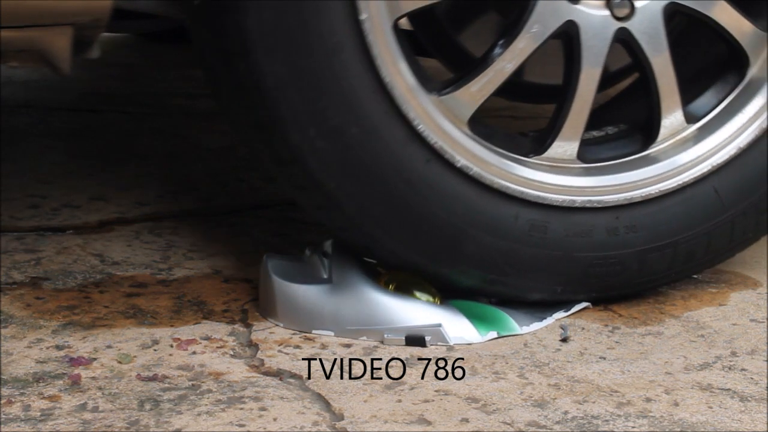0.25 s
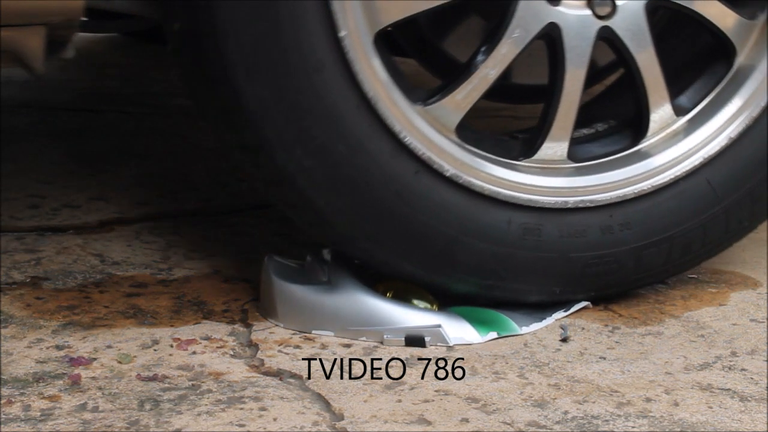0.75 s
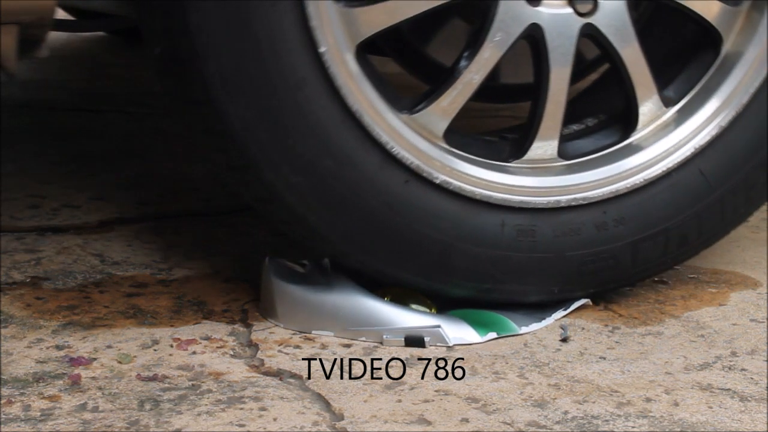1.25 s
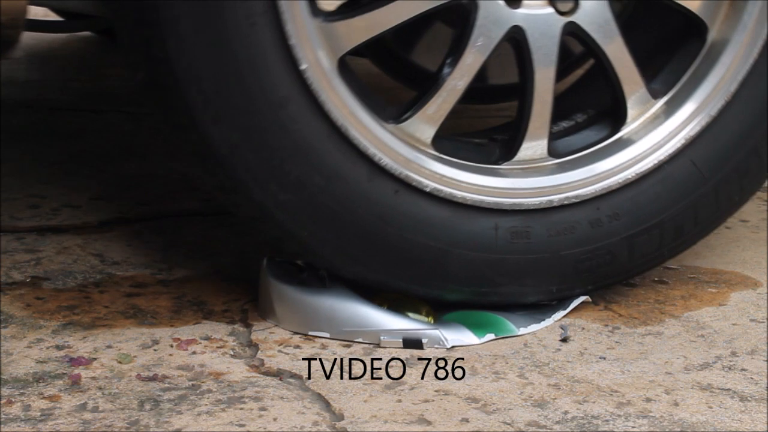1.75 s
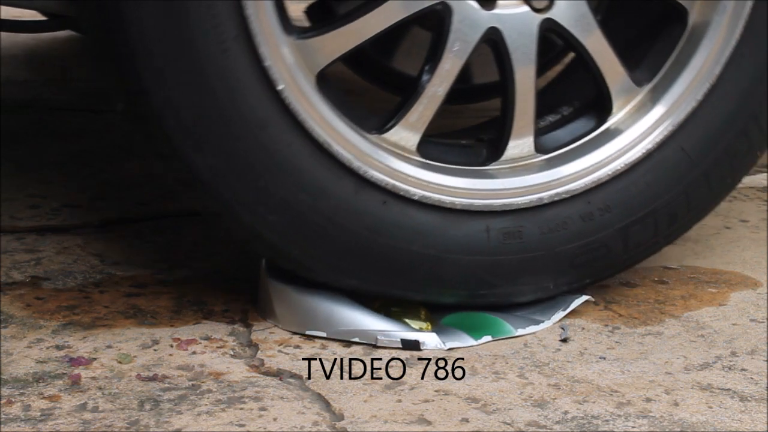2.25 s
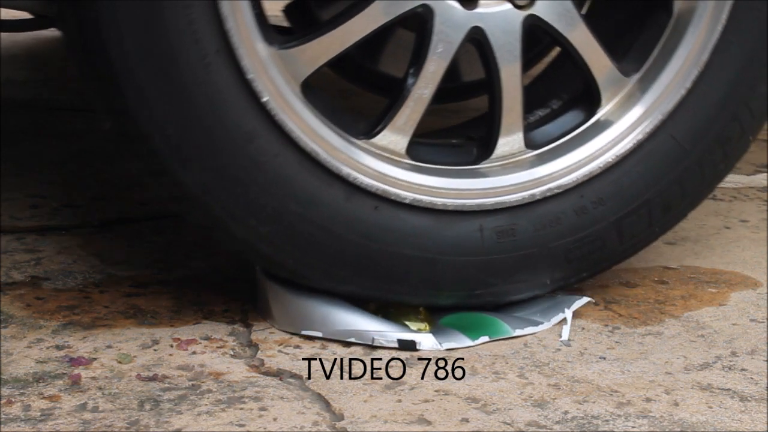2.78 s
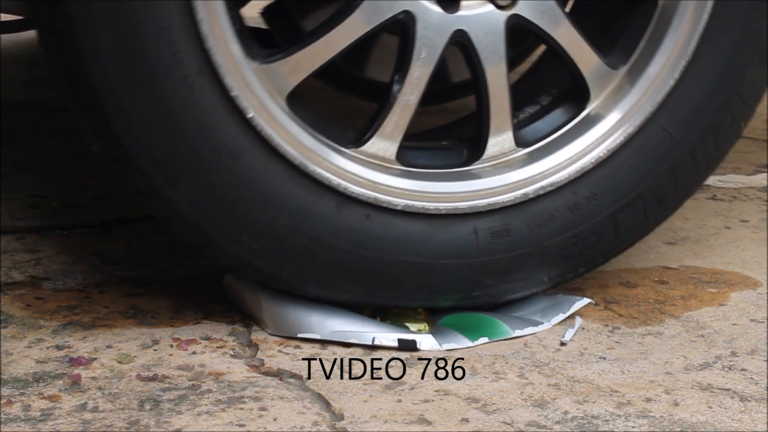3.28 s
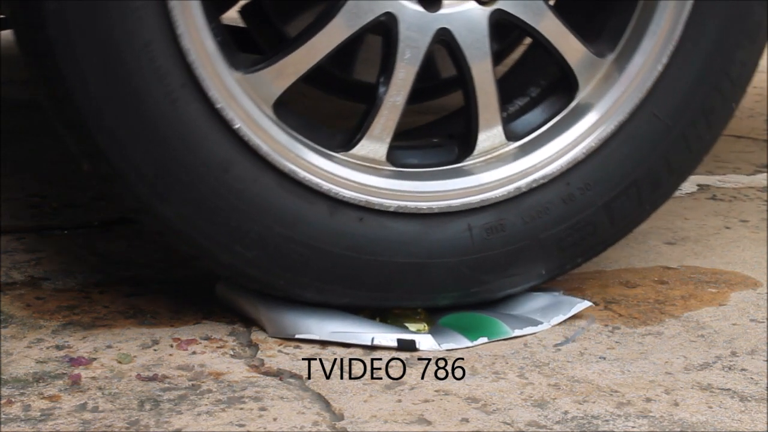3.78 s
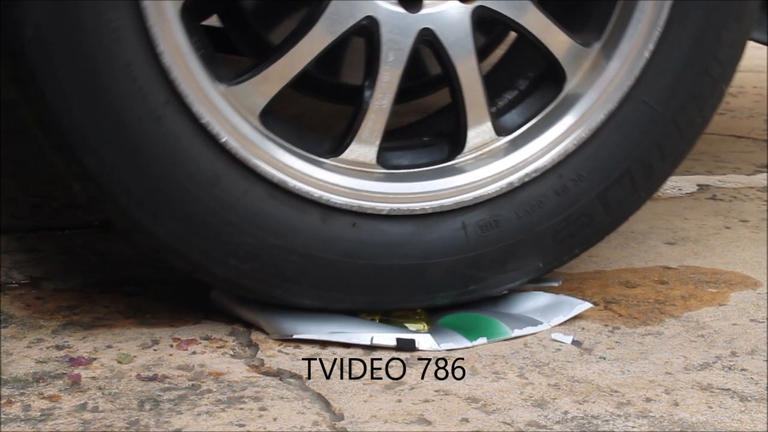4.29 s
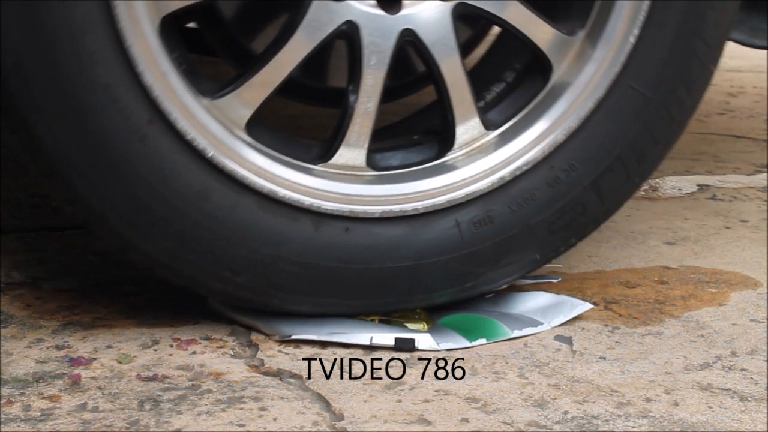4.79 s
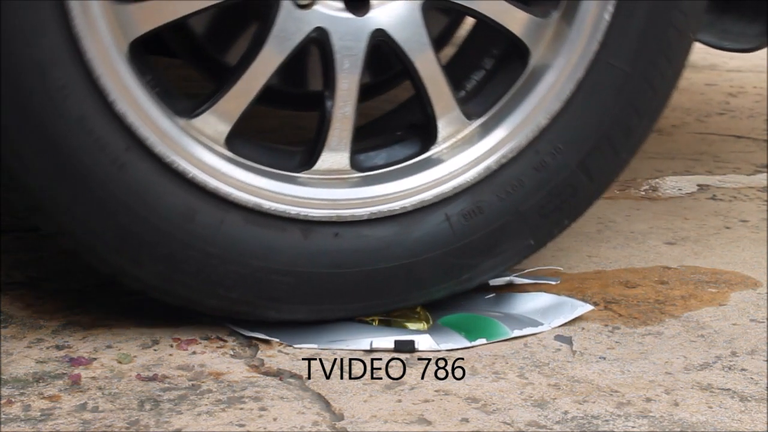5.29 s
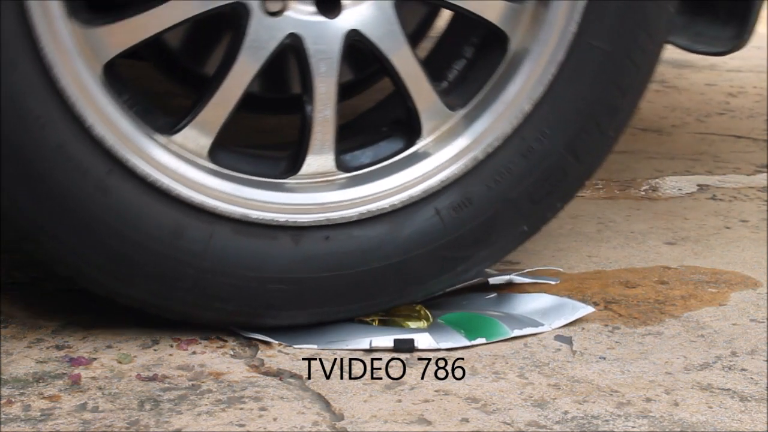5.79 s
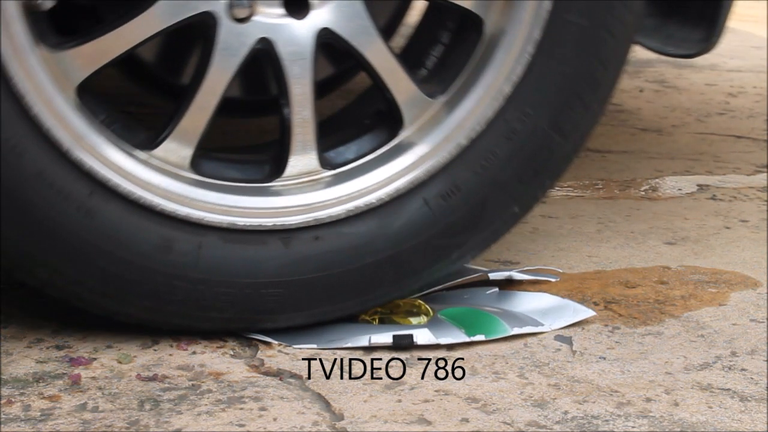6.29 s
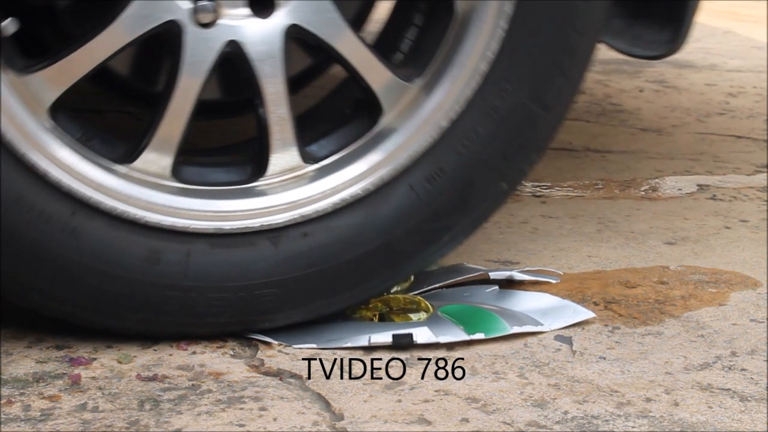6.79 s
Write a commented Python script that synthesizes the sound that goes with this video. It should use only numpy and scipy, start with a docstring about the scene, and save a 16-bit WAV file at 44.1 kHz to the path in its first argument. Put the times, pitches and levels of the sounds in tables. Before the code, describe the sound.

Hard plastic cracks, pops and grinds under a slowly rolling car tyre, each snap ringing out as in a hall.

```python
"""On concrete, in a space that rings like a hall, a car tyre rolls slowly over a hard plastic mask.
The shell breaks in sharp snaps: a quick run of tiny fractures and a hollow pop as it buckles.
In the gaps the tread grinds loose pieces and small cracks tick. Every snap leaves a long reverberation
over the car's low rumble, boom and drone, and a narrow ring swells in the tails of three snaps.
The sound is dull above 6 kHz and the big snaps overload."""
import sys
import numpy as np
from scipy import signal
from scipy.fft import rfft, irfft
from scipy.io import wavfile
from scipy.ndimage import uniform_filter1d

SR = 44100
rng = np.random.default_rng(int(sys.argv[2]) if len(sys.argv) > 2 else 0)


def master(y):
    """Save y as 16-bit WAV."""
    cut = np.clip(np.atleast_2d(y).T, -1, 1)
    pcm = np.round(cut * 32767)  # scale
    wavfile.write(sys.argv[1], SR, pcm.astype(np.int16))


N = 310905
TIME = np.arange(N) / SR
CRACK_HZ, SPLINTER_HZ = 1800, 3700

# The snaps of the shell. Each row: start in seconds, fracture length in seconds, knock pitch in Hz,
# fracture level in dB, brightness in dB, pop pitch in Hz, pop level in dB.
SHELL_SNAPS = [(.4499, .006, 605, -6, -1.5, 291, -1.5), (.621, .01, 460, -25, -10, 143, -13.5),
               (.777, .007, 800, -14.5, -1, 148, -11), (1.099, .0075, 576, -5.5, -1.5, 196, .5),
               (1.173, .005, 660, -14, 1.5, 205, -22), (1.441, .008, 940, -4.5, -.5, 312, -10),
               (1.4985, .013, 800, -12.5, 3, 156, -19), (1.528, .005, 550, -17, 0, 188, -20),
               (1.554, .005, 570, -16, 2, 188, -11), (1.72, .005, 680, -10.5, 1.5, 363, -15),
               (1.775, .003, 560, -13, -6, 288, -10), (1.8535, .003, 970, -17.5, 1, 191, -10),
               (2.046, .004, 570, -19, 7.5, 358, -14), (2.0805, .011, 620, -14, .5, 350, -16),
               (2.191, .0075, 520, -9.5, -.5, 326, -6), (2.229, .0066, 510, -20, 0, 323, -18.5),
               (2.419, .008, 510, -8.5, 0, 191, -4), (2.581, .014, 350, -24, -8, 330, -13),
               (2.7956, .003, 370, -20.5, 7.5, 328, -40), (2.8562, .0075, 620, -2.5, .5, 336, -3),
               (3.0825, .009, 680, -9, -.5, 199, -8), (3.247, .016, 520, -26, -10, 207, -12),
               (3.3515, .0035, 890, -18, 4.5, 202, -19), (3.4405, .004, 680, -14, -1, 218, -6),
               (3.7902, .005, 530, -14.5, -1.5, 207, -14), (3.828, .008, 1300, -17, 3, 231, -9),
               (3.841, .011, 720, -21, 1.5, 245, -10.5), (4.1184, .006, 520, -9, -1, 293, -10),
               (4.1466, .005, 540, -15, 2.5, 207, -33), (4.4637, .005, 800, -3, 1.5, 353, -7.5),
               (4.5005, .009, 760, -19, 1, 277, -19), (4.5934, .013, 780, -14.5, 1, 352, -11),
               (4.9904, .004, 870, -19, 7, 237, -28), (5.0414, .006, 950, -3, .5, 347, -5),
               (5.5928, .0036, 700, -25, -9, 296, -19), (6.184, .01, 550, -27.5, -5, 357, -26),
               (6.268, .006, 900, -34, -9, 331, -32), (6.3028, .007, 600, -32, -11, 352, -27),
               (6.4648, .0034, 740, -27, -4.5, 301, -36), (6.5088, .007, 700, -26.5, -4.5, 339, -37),
               (6.576, .008, 1040, -36, -4, 175, -35)]
def snap_voicings():
    """Voice each snap as pop, knock, crack and splinter; brightness trades knock for splinter."""
    for start_s, length_s, knock_hz, db, bright_db, pop_hz, pop_db in SHELL_SNAPS:
        crack_hz = CRACK_HZ * (knock_hz / 680) ** .35   # the crack partly follows the knock's pitch
        knock_db, crack_db, splinter_db = db + 3.8 - bright_db, db - .2, db - 4.6 + bright_db
        yield start_s, length_s, pop_hz, knock_hz, crack_hz, pop_db, knock_db, crack_db, splinter_db


def breaking_mask():
    """The shell gives way under the tyre, snap by snap, each with its own blend of the four parts."""
    out = np.zeros(N + SR)
    for start_s, length_s, pop_hz, knock_hz, crack_hz, *levels_db in snap_voicings():
        sound = from_db(levels_db) @ snap(length_s, pop_hz, knock_hz, crack_hz)
        start = int(start_s * SR)
        out[start:start + len(sound)] += sound
    return out[:N]


# The shell's resonances. Each entry: half-width in octaves, for knock, crack and splinter in turn.
RESONANCE_WIDTHS = [0.56, 0.41, 0.38]
def snap(length_s, pop_hz, knock_hz, crack_hz, pop_cycles=1.5, slips_per_s=6000, spread_db=2.0):
    """A crack runs in tiny slips and the panel buckles: gives pop, knock, crack and splinter."""
    t = np.arange(int(.1 * SR)) / SR
    crumble = from_db(-26) * np.exp(-t / .037)   # the broken edges crumble briefly
    stress = np.exp(-(t / max(length_s, 1e-3)) ** 1.75) + crumble
    slips = (rng.random(len(t)) < slips_per_s / SR) * from_db(spread_db * rng.standard_normal(len(t)))
    slips[0] = 2.82   # the first break is a strong one
    pop = np.exp(-t * pop_hz / pop_cycles) * np.sin(2 * np.pi * pop_hz * t)
    parts = [band(pop, pop_hz / 2, SPLINTER_HZ, order=1)]
    for hz, octaves in zip([knock_hz, crack_hz, SPLINTER_HZ], RESONANCE_WIDTHS):
        signs = rng.choice([-1, 1], len(t))
        parts.append(resonance(slips * stress * signs, hz, octaves))
    energy = np.sum(np.square(parts), axis=1, keepdims=True) / SR
    return parts / np.sqrt(energy / .01)   # each part has the energy of 10 ms at rms 1


# Bouts of grinding. Each row: peak time in seconds, half-width in seconds, level in dB,
# tilt in dB per octave.
GRIND_BOUTS = [(.54, .07, -26, 0), (.81, .04, -28, 2.5), (1.64, .11, -20.5, .5), (2.32, .08, -26, -4),
               (2.6, .07, -26, 0), (2.96, .08, -19.5, 0), (3.53, .11, -22.5, .5), (3.97, .09, -30, 0),
               (4.28, .08, -26.5, 1), (4.76, .12, -20, -1.5), (5.29, .12, -22.5, 0)]
def grinding(t, hz, pivot_hz=1200):
    """How hard the tread grinds the loose pieces, heard at one pitch: each bout swells and fades."""
    return sum(from_db(db + tilt_db * np.log2(hz / pivot_hz)) * swell(t, peak_s, width_s)
               for peak_s, width_s, db, tilt_db in GRIND_BOUTS)


# The ring of the loose pieces. Each row: frequency in Hz, relative level in dB.
PIECE_TONE = [(250, -0.5), (450, 5), (900, 6.5), (1800, 6), (3000, -6.5), (5500, -22)]
def crunch(grains_per_s=1100, size_db=2.6, grit_db=-40):
    """Pieces grind on the concrete: random ticks, each ringing the plastic in a colour of its own."""
    hits = rng.random(N) < grains_per_s / SR
    ticks = hits * from_db(size_db * np.minimum(rng.exponential(1, N), 3))
    centres_hz = 300 * 2. ** np.arange(5)
    shares = from_db(at_hz(PIECE_TONE, centres_hz)[0])
    out = 0
    for hz, share in zip(centres_hz, shares / np.linalg.norm(shares)):
        ring = resonance(ticks * rng.uniform(-.91, 1, N), hz, octaves=.5)
        strength = np.hypot(grinding(TIME, hz), from_db(grit_db))   # grit: the tread on bare concrete
        out += share * strength * rms_one(ring)
    return out


def crackles(count=45, spread_db=2.5, length_s=.003):
    """Small stray fractures at random moments, following the strength of the grinding around them."""
    out = np.zeros(N + SR)
    for when, size, colour in rng.uniform(-1, 1, (count, 3)):
        start = int((when + 1) / 2 * (N - 1))
        detune = 2 ** (colour / 2)
        _, knock, crack, splinter = snap(length_s, 300, 800 * detune, CRACK_HZ * detune)
        sound = from_db(-3) * knock + from_db(-2.5) * crack + from_db(-12) * splinter
        gain = grinding(start / SR, CRACK_HZ) * from_db(-1.5 + spread_db * size)
        out[start:start + len(sound)] += gain * sound
    return out[:N]


# The reverb tail. Each row: frequency in Hz, level against the dry snap in dB,
# time to decay by 60 dB in seconds, build-up in seconds.
HALL_TAIL = [(100, -6.5, 2.6, 0.052), (224, -3.5, 2.05, 0.068), (367, -2.5, 2.64, 0.061),
             (676, -3.2, 1.5, 0.2), (1740, -4, 1.85, 0.036), (3160, -8.5, 2.04, 0.0089),
             (5270, -14.5, 1.1, 0.0066)]
def hall(predelay_s=.0027, flutter_db=1.6, drift_db=1.5):
    """Every snap spreads into a diffuse tail of its own colour; the lows bloom later than the highs."""
    start_s, _, pop_hz, knock_hz, crack_hz, *levels_db = np.transpose(list(snap_voicings()))
    centres_hz = np.geomspace(70, 5600, 20)
    # each part of a snap feeds the third octaves around its own pitch
    pitches_hz, widths_octaves = [pop_hz, knock_hz, crack_hz, SPLINTER_HZ], [.4, .56, .35, .31]
    energy = 0
    for hz, octaves, level_db in zip(pitches_hz, widths_octaves, levels_db):
        share = swell(np.log2(centres_hz[:, None] / hz), 0, octaves)
        energy += share / share.sum(axis=0) * from_db(level_db) ** 2 * .01
    t = np.arange(0, N / SR, .002)
    age = np.maximum(t - start_s[:, None] - predelay_s, 0)
    white, out = rng.standard_normal((2, N)), 0
    for k, hz in enumerate(centres_hz):
        wet_db, t60, build_s = at_hz(HALL_TAIL, hz)
        fade_s = t60 / np.log(10 ** 6)
        area = fade_s ** 2 / (fade_s + build_s)
        tails = (1 - np.exp(-age / build_s)) * np.exp(-age / fade_s) / area
        # reflections arrive in clumps, and the hall's resonances shift the colour slowly
        flutter = rms_one(uniform_filter1d(rng.standard_normal(len(t)), size=25))
        drift = rms_one(uniform_filter1d(rng.standard_normal(len(t)), size=120))
        clumps = from_db(flutter_db * flutter + drift_db * drift)
        envelope = np.interp(TIME, t, clumps * np.sqrt(energy[k] @ tails))
        wash = rms_one(resonance(white[k % 2], hz, octaves=1 / 6, order=3))
        out += from_db(wet_db) * envelope * wash
    return out


# Rings in the snaps' tails. Each row: peak time in seconds, half-width in seconds, pitch in Hz,
# level in dB.
SNAP_AFTER_RINGS = [(3.95, .09, 1700, -26), (4.27, .09, 2000, -29), (5.28, .13, 1650, -22)]
def after_rings(grains_per_s=1500):
    """A narrow ring near 1.7-2 kHz swells and fades in the tails of three snaps."""
    out = 0
    for peak_s, width_s, hz, db in SNAP_AFTER_RINGS:
        grains = (rng.random(N) < grains_per_s / SR) * rng.choice([-1, 1], N)
        out += from_db(db) * swell(TIME, peak_s, width_s) * rms_one(resonance(grains, hz, octaves=.25))
    return out


# Lurches of the tyre. Each row: start in seconds, rise time in seconds, peak level in dB.
TYRE_LURCHES = [(-.03, .13, -22.5), (.44, .19, -21.5), (1.6, .35, -28), (2.65, .24, -25), (4.47, .22, -24)]
def lurching():
    """Envelope of the tyre sinking as the shell gives way: each lurch swells and dies away."""
    out = 0
    for start_s, rise_s, db in TYRE_LURCHES:
        age = np.maximum(TIME - start_s, 0) / rise_s
        out += from_db(db) * age * np.exp((1 - age ** 2) / 2)
    return out


# The noise bed of the car and its surroundings. Each row: frequency in Hz, relative density in dB.
RUMBLE_TONE = [(15, -35), (25, -7.5), (49, -4), (76, -15.5), (104, -7.5), (167, -5), (258, -7), (288, -5.5),
               (378, -7.5), (414, -8.5), (915, -13.5), (1230, -18.5), (4780, -38), (5600, -45),
               (7280, -82.5), (12300, -120)]
# The load, building as the wheel climbs the shell. Each row: time in seconds, relative load in dB.
WHEEL_LOAD = [(0.0, -42), (0.39, -46), (0.59, -31), (0.98, -42), (2.22, -43), (3.77, -26), (3.83, -37),
              (6.85, -46), (7.05, -52)]
def car(boom_hz=124.7, drone_hz=61.5, full_load_db=-29):
    """Broad rumble and hiss, a boom as the tyre sinks and a wavering drone that grows under load."""
    hz = np.maximum(np.fft.rfftfreq(N, 1 / SR), 1)
    tone = from_db(at_hz(RUMBLE_TONE, hz)[0])
    rumble = rms_one(irfft(rfft(rng.standard_normal(N)) * tone, N))
    boom = rms_one(resonance(rng.standard_normal(N), boom_hz, octaves=.44))
    waver = rms_one(band(rng.standard_normal(N), drone_hz - 6, drone_hz + 6))
    drone = rms_one(np.sin(2 * np.pi * drone_hz * TIME) + .38 * waver)
    load_db = np.interp(TIME, *np.transpose(WHEEL_LOAD))
    strain_db = np.minimum(load_db - full_load_db, 0)   # 0 when the whole weight bears on the shell
    lurch = lurching()
    rumble_gain = np.hypot(from_db(-25.5 + .27 * strain_db), from_db(-5) * lurch)
    boom_gain = np.hypot(from_db(-42), lurch)   # a faint boom stays between lurches
    drone_gain = from_db(-26.5 + 1.25 * strain_db)
    return rumble_gain * rumble + boom_gain * boom + drone_gain * drone


def from_db(db):
    """Decibels to gain."""
    return 10 ** (np.asarray(db) / 20)


def rms_one(x):
    """Scale to rms 1."""
    return x / np.sqrt(np.mean(x ** 2) + 1e-20)


def swell(x, peak, width):
    """A bell-shaped rise and fall of height 1."""
    return np.exp(-.5 * ((x - peak) / width) ** 2)


def at_hz(rows, hz):
    """Read a table's value columns on a log-frequency axis."""
    points, *columns = np.transpose(rows)
    return [np.interp(np.log(hz), np.log(points), column) for column in columns]


def band(x, low_hz, high_hz, order=2):
    """Causal band-pass."""
    return signal.sosfilt(signal.butter(order, [low_hz, high_hz], "band", fs=SR, output="sos"), x)


def resonance(x, hz, octaves, order=2):
    """Ring a band that reaches the given octaves to either side of a pitch."""
    return band(x + 1e-18, hz / 2 ** octaves, hz * 2 ** octaves, order)


def scene():
    """The breaking mask, its reverberation and the car, in mono."""
    return (breaking_mask() + crackles() + crunch() + hall() + car() + after_rings())[None]


def record(dry, treble_hz=5880, soften_hz=6100, cutoff_hz=16000):
    """A steep treble cut, then overload: the big snaps clip and gain a bright edge, which is softened."""
    dull = signal.sosfilt(signal.ellip(9, .3, 80, treble_hz, fs=SR, output="sos"), dry)
    clipped = np.clip(dull, -1, 1)
    rounded = signal.sosfiltfilt(signal.butter(12, soften_hz, fs=SR, output="sos"), clipped)
    softened = .7 * clipped + .3 * rounded
    return signal.sosfilt(signal.ellip(8, .1, 70, cutoff_hz, fs=SR, output="sos"), softened)


dry = scene()
out = record(dry)
master(out)
```